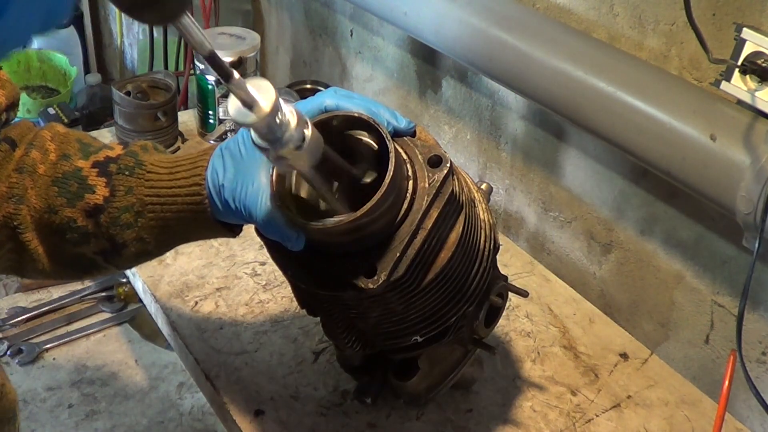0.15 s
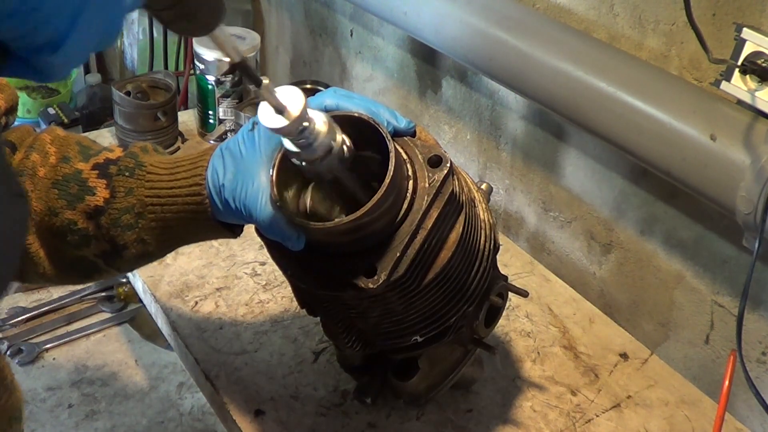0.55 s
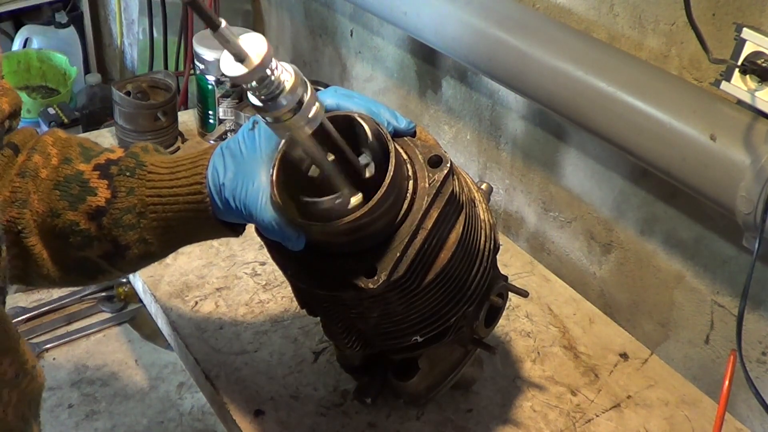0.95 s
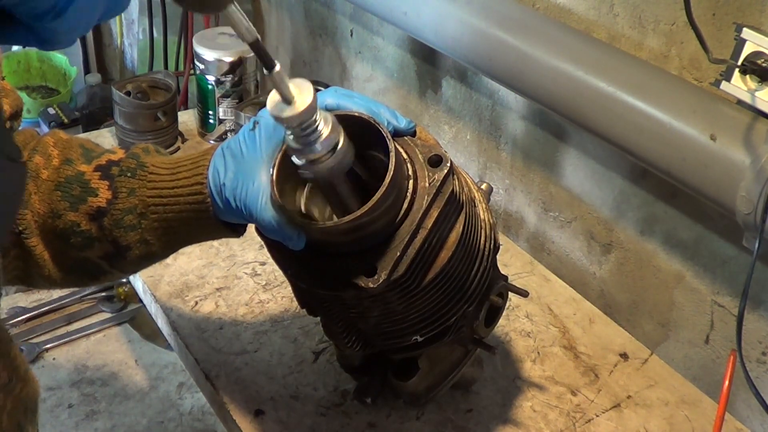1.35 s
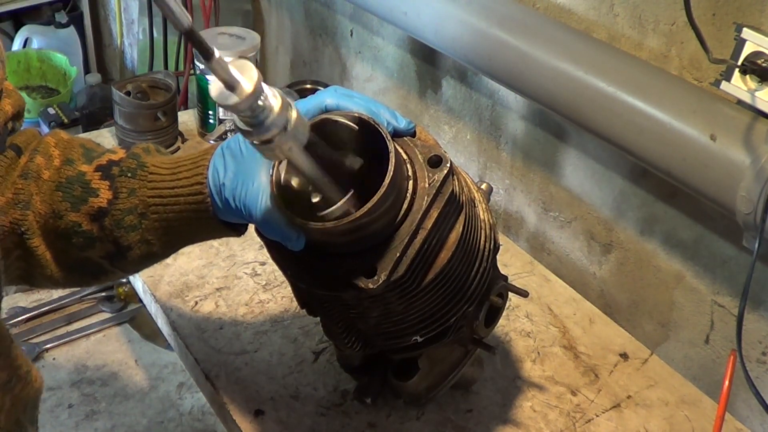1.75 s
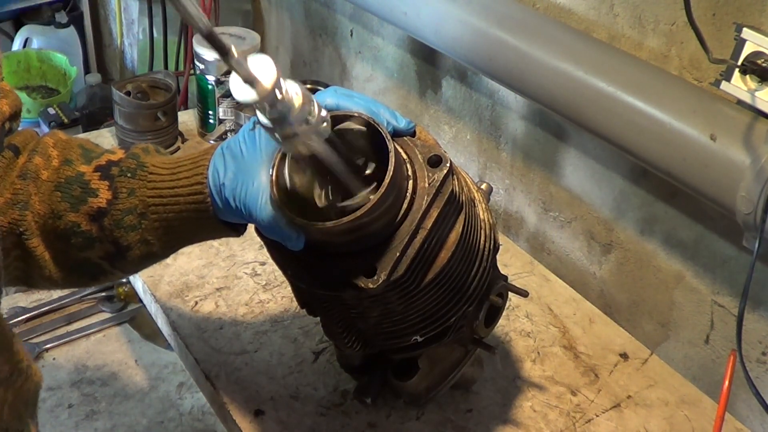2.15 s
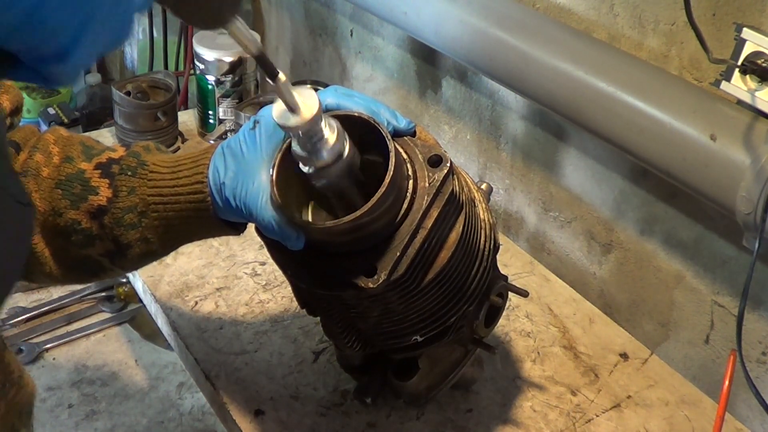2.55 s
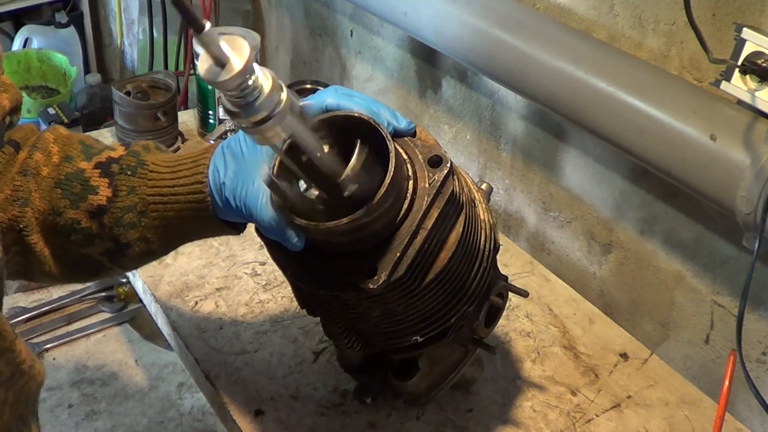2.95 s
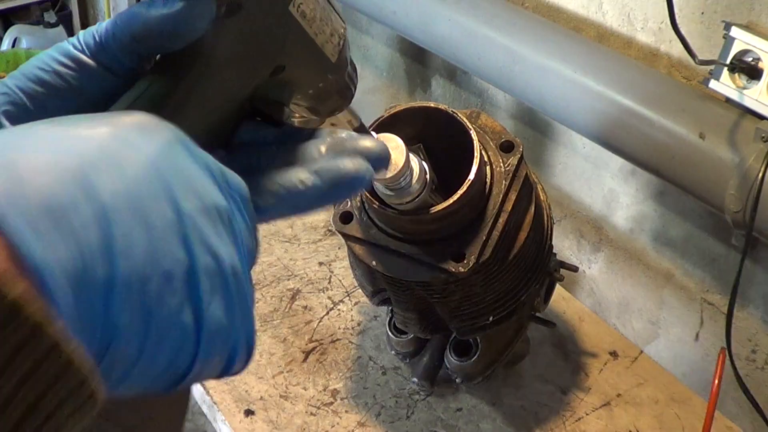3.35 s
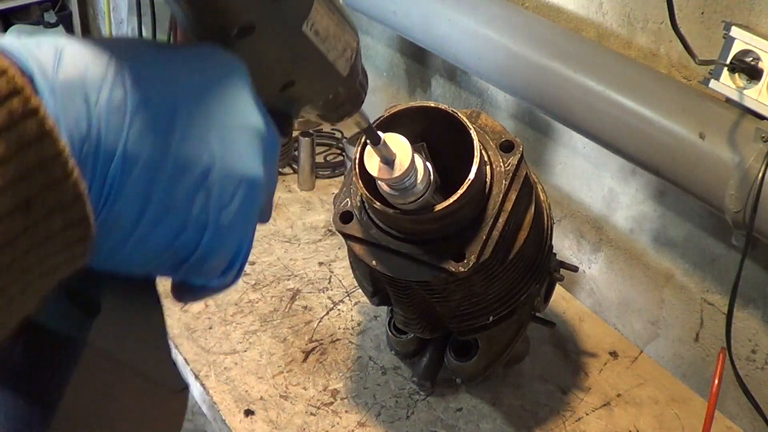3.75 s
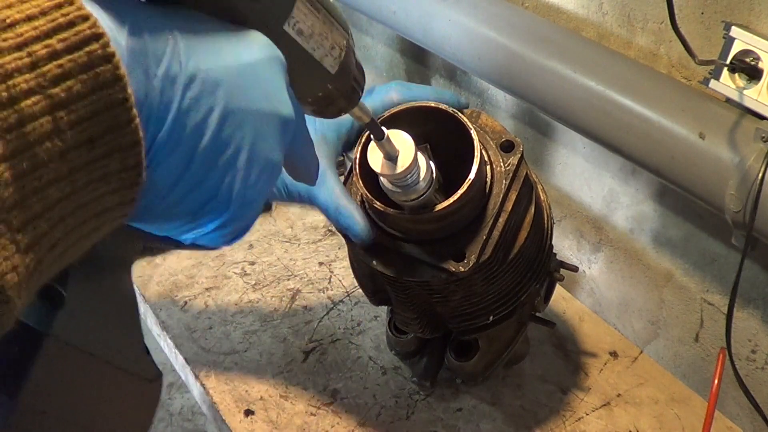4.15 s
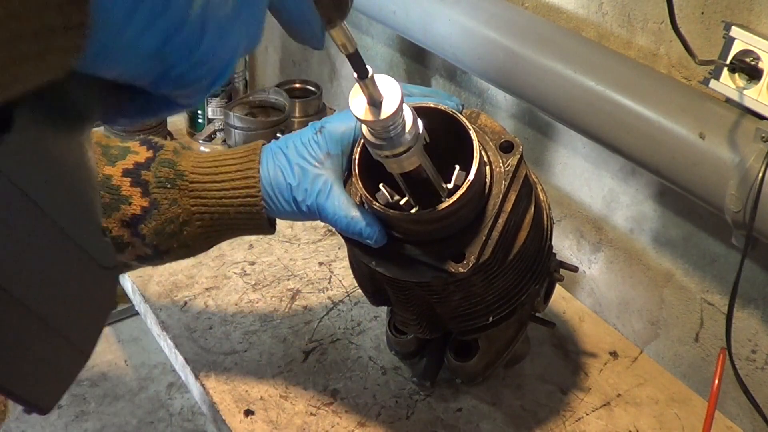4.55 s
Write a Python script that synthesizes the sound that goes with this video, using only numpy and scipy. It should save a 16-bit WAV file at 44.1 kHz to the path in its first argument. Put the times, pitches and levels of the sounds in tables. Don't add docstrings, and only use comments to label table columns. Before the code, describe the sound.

Loud hissing, whining honing with metallic ringing on each stroke stops abruptly; soft handling, a dull bench thud and a bright dragging scrape follow.

```python
import sys
import numpy as np
from scipy import signal
from scipy.fft import rfft, irfft, next_fast_len
from scipy.io import wavfile
from scipy.ndimage import uniform_filter1d, map_coordinates

SR = 44100
rng = np.random.default_rng(int(sys.argv[2]) if len(sys.argv) > 2 else 0)


def ratio_of_db(decibels):
    return 10 ** (np.asarray(decibels, float) / 20)


def store_pcm(level_fs):
    pcm = np.round(np.clip(level_fs, -1, 1) * 32767).astype(np.int16)
    wavfile.write(sys.argv[1], SR, np.atleast_2d(pcm).T)


N = 207711
T = np.arange(N) / SR
CUT = 3.2245


def unit(x):
    return x / np.sqrt(np.mean(x ** 2) + 1e-20)


def along(points, hz):
    f, v = np.transpose(points)
    return np.interp(np.log(hz + 1), np.log(f + 1), v)


def curves(rows):
    s, *cols = np.transpose(rows)
    return [np.interp(T, s, c) for c in cols]


def wobble(rate):
    knots = rng.standard_normal(int(N * rate / SR) + 4)
    return map_coordinates(knots, [T * rate])


def near(s, reach):
    return slice(max(round((s - reach) * SR), 0), round((s + reach) * SR))


def bump(t, s, width):
    return np.exp(-((t - s) / width) ** 2)


def swells(rows, power):
    rows = list(rows)
    out = np.zeros((len(rows), N))
    for hump, (s, rise, fall) in zip(out, rows):
        at = near(s, 7 * max(rise, fall))
        hump[at] = np.exp(-(np.abs(T[at] - s) / np.where(T[at] < s, rise, fall)) ** power)
    return out


def filtered(x, response):
    m = next_fast_len(N + SR // 2)
    return irfft(rfft(x, m) * response(np.fft.rfftfreq(m, 1 / SR)), m)[..., :N]


def mode(f, hz, width):
    return 1j * f * width / (hz * hz - f * f + 1j * f * width)


def grit(patchy_db, grain_db, size=256):
    z = signal.stft(rng.standard_normal((2, N)), nperseg=size)[2]
    field = uniform_filter1d(rng.standard_normal(z.shape[1:]), size=2, axis=0)
    field = uniform_filter1d(field, size=6, axis=1)
    patches = signal.istft(z * ratio_of_db(patchy_db * unit(field)), nperseg=size)[1][:, :N]
    return patches * ratio_of_db(grain_db * wobble(700))


def shaped(x, spectrum, peaks=()):
    def response(f):
        lift = sum(np.abs(ratio_of_db(db) * mode(f, hz, width)) ** 2 for hz, width, db in peaks)
        return ratio_of_db(along(spectrum, f)) * np.sqrt(1 + lift)
    return unit(filtered(x, response))


def ringing(modes, own_db, rate):
    out = np.zeros((2, N))
    for hz, width, db in modes:
        push = ratio_of_db(own_db * wobble(rate)) * rng.standard_normal((2, N))
        out += ratio_of_db(db) * unit(filtered(push, lambda f: mode(f, hz, width) * mode(f, hz, 4 * width)))
    return out


# (time [s], how far out [0-1], half length [s])
STROKES = [
    (.36, 0.58, 0.19),
    (1.03, 0.96, 0.15),
    (1.718, .95, 0.18),
    (2.33, 0.88, .16),
    (2.98, 0.92, .16),
]
# (time [s], width [s], strength [0-1])
JOLTS = [
    (.7, .035, 0.99),
    (1.5, .05, .3),
    (1.97, .04, .35),
    (2.7, .1, 0.05),
    (2.96, 0.036, .4),
    (3.225, 0.018, .5),
]
# (frequency [Hz], level [dB per Hz])
STONES = [(1350, -46.5), (2300, -12.5), (3030, -8.5), (3540, -7), (4300, -11.5), (5050, -4), (6880, -4.5),
          (8430, -4), (10900, -6.5), (13400, -9), (15000, -11.5), (15900, -15)]
# (frequency [Hz], width [Hz], level [dB])
FINS = [(4900, 820, -5), (6340, 250, -9), (10920, 490, -1)]
# (frequency [Hz], width [Hz], level [dB])
SQUEAL = [(7910, 210, -4.5), (8500, 350, -0.5), (8960, 1000, -9)]
# (frequency [Hz], width [Hz], level [dB])
LINER = [(2730, 230, -18), (3530, 90, -1), (4880, 150, 0), (5350, 60, -7), (6180, 90, -4), (6540, 150, 4),
         (7250, 120, 3), (10770, 230, 3)]
# (frequency [Hz], level [dB per Hz])
RASP = [(700, -41.5), (1400, -8.5), (1800, -0.5), (2160, -2.5), (2800, -3), (4000, -23.5)]


def hone():
    out = np.array([far for _, far, _ in STROKES]) @ swells([(s, half, half) for s, _, half in STROKES], power=4.1)
    jolt = np.array([hard for *_, hard in JOLTS]) @ swells([(s, wide, wide) for s, wide, _ in JOLTS], power=2)
    scrape_db = -17.32 - 1.8 * out + 0.96 * wobble(14)
    scrape = ratio_of_db(scrape_db) * shaped(grit(patchy_db=2.6, grain_db=1.5, size=512), STONES, FINS)
    squeal_db = -22.5 + 0.33 * out - 0.69 * T - 9 * jolt
    wakes = 1 - np.exp(-T / 0.033)
    squeal = wakes * ratio_of_db(squeal_db) * ringing(SQUEAL, own_db=1.5, rate=25)
    ring = ratio_of_db(-44 + 12.04 * out) * ringing(LINER, own_db=2.2, rate=45)
    rasp_db = -29 - 4 * out + 5.1 * jolt
    rasp = ratio_of_db(rasp_db) * shaped(grit(patchy_db=2.5, grain_db=1.0, size=512), RASP, [(2060, 190, 0)])
    return scrape + squeal + ring + rasp


# (time
# [s], level [dB rms], frequency [Hz], width [s])
FLARES = [(1.005, -28, 3560, .016), (1.11, -34, 3520, .02), (2.44, -32, 4900, .03), (1.71, -32, 4860, .04),
          (2.39, -32, 4850, .03), (1.63, -31, 7260, .03), (2.32, -30, 7270, .04), (.3, -35, 3540, .07),
          (1.68, -30, 3560, .03), (1.85, -34, 3520, .03), (1.93, -36, 3490, .025), (2.26, -32, 3530, .035),
          (2.4, -35, 3470, .015), (2.85, -35, 3530, .03), (.255, -26, 4850, 0.028), (.93, -29, 4870, 0.02),
          (1.05, -25, 6500, .035), (1.045, -28, 3570, .03), (.3, -30, 7280, .05), (.93, -29, 7270, .03),
          (1.12, -29, 7270, .05), (1.72, -30, 7270, .07), (2.9, -29, 7260, .04), (3.04, -28, 7250, .04),
          (1.04, -34, 4830, .06), (2.32, -30, 4850, .05), (2.92, -32, 4860, .03), (4.115, -42, 4900, .02),
          (4.105, -43, 5560, .018), (1.65, -31, 4850, 0.031), (2.27, -24, 6540, .03),
          (1.61, -33, 3560, 0.02), (1.76, -29, 3520, .035), (2.34, -29, 3540, .03), (2.9, -31, 3550, .025),
          (3.06, -31, 3530, .025), (3.12, -29, 4860, .05), (2.22, -29, 7300, .03), (2.44, -29, 7260, .045),
          (4.395, -31, 6080, .012), (4.43, -28, 6050, .012), (4.515, -31, 6050, .01),
          (4.57, -31, 4830, .008), (4.525, -33, 4850, .008), (4.39, -42, 2740, .02),
          (4.445, -44.5, 449, 0.018), (4.448, -37, 2260, .009), (4.482, -33, 2270, 0.017),
          (4.41, -39, 3540, .025), (4.472, -39, 3520, .015), (4.41, -45, 2250, .02),
          (4.565, -38, 2270, .015), (4.485, -43, 2770, .02), (4.495, -35, 3550, 0.013),
          (4.532, -38, 3550, .008), (4.55, -33.5, 2740, 0.025), (4.583, -29, 3560, 0.007),
          (4.6, -29, 3560, .007), (4.58, -32, 2730, 0.016), (4.62, -46, 2740, 0.018),
          (4.635, -39, 3570, 0.006)]


def flares():
    rough = ratio_of_db(1.6 * wobble(70))
    drift = .95 * wobble(70)
    line = np.zeros(N)
    for s, db, hz, width in FLARES:
        at = near(s, .2)
        line[at] += ratio_of_db(db + 3) * bump(T[at], s, width) * np.sin(2 * np.pi * hz * T[at] + drift[at])
    return np.array([rough * line, .5 * np.roll(line, 60)])


# (time [s], order, change [dB], width [s])
FADES = [(.5, 2, -8, .08), (1.0, 2, -10, .03), (1.32, 2, -8, .04), (1.46, 2, 6, .03), (1.68, 2, -6, .06),
         (2.63, 3, 2, .02), (1.88, 3, 3, .03), (3.15, 3, 2, .04), (2.41, 2, -10, .04), (2.68, 2, -6, .03),
         (2.87, 2, -8, .03), (3.08, 2, -7, .1), (3.0, 1, -6, .05), (2.42, 1, -5, .04), (.42, 1, -4, .03),
         (.17, 1, -5, .04), (1.3, 3, -6, .04), (.6, 3, 2, .08), (.31, 3, 3, .04), (.72, 3, -4, .04),
         (.86, 3, 3, .05), (2.15, 3, 3, .05), (2.78, 3, 3, .06), (3.03, 3, -3, .04), (2.63, 3, 3, .03)]


def fades(order):
    out = np.zeros(N)
    for s, k, db, width in FADES:
        if k == order:
            at = near(s, .25)
            out[at] += db * bump(T[at], s, width)
    return out


# (time [s], shaft frequency [Hz], order 1 [dB], order 3 [dB])
MOTOR = [(0.0, 400.5, -37, -48), (0.045, 552, -36, -43), (0.11, 614, -40, -39), (0.21, 585, -37.5, -43),
         (0.3, 533, -37, -33), (0.425, 482, -37, -40), (0.53, 501, -34.5, -37), (0.7, 506, -31.5, -39),
         (0.98, 517, -37, -32), (1.42, 507.4, -33, -42), (1.47, 520.3, -33.5, -27.5),
         (1.7, 547.8, -32, -40), (1.95, 538, -32.5, -29), (2.38, 526.5, -35.5, -36),
         (2.52, 526, -28.5, -31), (2.69, 514, -27, -35), (2.96, 528, -33, -35), (3.22, 522.5, -28.5, -35)]
# (time [s], change [Hz], rise [s], fall [s])
SAGS = [
    (.64, 5, .06, .02),
    (1.3, -9, .07, .07),
    (2.19, -4, .05, .05),
    (2.46, -4, .05, .04),
    (2.64, 10, .09, .006),
    (2.68, -4, .02, .04),
    (2.85, 4, .07, .07),
    (1.72, 3, .01, .05),
]
# (multiple of the whine, level [dB])
GEARS = [(1.11, -51), (1.333, -53)]
# (time [s], order, level [dB rms], width [s])
BREAKS = [(.07, 5, -32, .02), (.55, 5, -41, .08), (.71, 5, -38, .03), (1.1, 5, -41, .06),
          (2.3, 5, -34, .045), (2.47, 5, -33, .018), (2.72, 5, -36, .07), (.71, 4, -32, .025),
          (1.58, 4, -35, .025), (1.73, 4, -34, .04), (1.85, 4, -35, .025), (2.32, 4, -34, .035),
          (2.39, 4, -35, .025), (2.75, 4, -39, .03), (3.0, 4, -40, .08), (1.05, 7, -35, .04),
          (2.93, 7, -36, .04), (2.16, 6, -36, .015)]
# (frequency [Hz], level [dB per Hz])
CASING = [(25, -21), (200, -44), (480, -6.5), (800, -0.5), (1100, 6.5), (1500, -5), (2200, 4), (4000, -48)]


def motor():
    hz, first, third = curves(MOTOR)
    first = first - 8.5 * np.clip((T - 1.5) / 0.019, 0, 1)
    pulls = swells([(s, rise, fall) for s, _, rise, fall in SAGS], power=2)
    hz = hz + np.array([row[1] for row in SAGS]) @ pulls
    drift = .17 * wobble(30)
    turn = 2 * np.pi * np.cumsum(hz) / SR + drift
    young = -10 * np.clip(2 - 2 * T / .45, 0, 1)
    second = -43 + 1.5 * wobble(25) + young + fades(order=2)
    fourth = -54 - .4 * (first - first.mean()) + 4.5 * wobble(14) + young
    first = first + fades(order=1) + .9 * wobble(12)
    third = third + fades(order=3)
    line = np.zeros(N)
    for k, db in [(1, first), (2, second), (3, third), (4, fourth), *GEARS]:
        line += np.sqrt(2) * ratio_of_db(db + 0.52 * k * wobble(45)) * np.sin(k * turn)
    flutter_db = 3 * unit(drift)
    for s, k, db, width in BREAKS:
        at = near(s, .25)
        line[at] += ratio_of_db(db + 3 + flutter_db[at]) * bump(T[at], s, width) * np.sin(k * turn[at])
    roar = ratio_of_db(-37.5) * shaped(grit(patchy_db=1.5, grain_db=1.5), CASING)
    return np.array([line, 0 * line]) + roar


# (frequency [Hz], level [dB per Hz])
DRAGGED = [(2000, -30), (3000, -16), (4000, -15), (5000, -8), (6500, -3), (8450, -1.5), (11000, -9),
           (14900, -15), (16000, -18)]
# (frequency [Hz], width [Hz], level [dB])
BORE = [(4800, 26, 2), (5100, 170, -1), (5570, 49, -16), (6160, 88, -3.5), (6900, 78, -7), (7380, 21, 2),
        (7940, 120, -4), (8400, 140, -1), (10800, 54, -11)]
# (frequency [Hz], width [Hz], level [dB])
MOUTH = [(2270, 70, -7), (2740, 100, -6), (3550, 60, 1)]
# (frequency [Hz], level [dB per Hz])
RUMBLE = [(250, -15), (500, -4.5), (1000, 0), (1600, 3), (2500, -4), (3500, -10), (5000, -30)]


def drag():
    full_s, free_s = 4.415, 4.588
    late = np.clip(full_s - T, 0, 1) / .045
    gone = np.clip(T - free_s, 0, 1) / .034
    speed = np.exp(-late ** 1.7 - gone ** 2.3)
    since = np.clip(T - full_s, -.1, .2)
    scrape_db = -20 - 12 * since + 0.77 * wobble(60)
    bore = [(hz, width, db + 8) for hz, width, db in BORE]
    scrape = ratio_of_db(scrape_db) * shaped(grit(patchy_db=2.0, grain_db=1.5), DRAGGED, bore)
    ring = ratio_of_db(-43 + 18 * since) * ringing(MOUTH, own_db=2.5, rate=45)
    rumble = ratio_of_db(-40.5) * shaped(grit(patchy_db=2.5, grain_db=1.5), RUMBLE)
    return speed * scrape + speed ** 0.75 * (ring + rumble)


# (time [s], peak level [dB], frequency [Hz], t60 [s])
PADS = [
    (3.297, -30, 500, .009),
    (3.297, -33, 850, .006),
    (3.326, -26, 310, .014),
    (3.326, -31, 850, .006),
    (3.339, -29, 310, .014),
    (3.339, -33, 800, .006),
    (3.369, -35, 430, .012),
    (3.577, -25, 300, .03),
    (4.337, -27, 300, .03),
]
# (time [s], peak level [dB], frequency [Hz], t60 [s])
TICKS = [(3.698, -35, 1500, .005), (3.543, -31, 1750, 0.006), (3.543, -34, 2450, .006),
         (3.567, -31, 1750, .012), (3.568, -33, 2300, .012), (3.567, -33, 850, .015),
         (3.569, -34, 520, .02), (3.6066, -29, 2030, 0.007), (3.623, -29, 1660, 0.006),
         (3.666, -27, 1680, 0.007), (3.8667, -29, 2400, 0.005), (3.8667, -33, 1600, .004),
         (4.132, -33, 1600, 0.022), (4.331, -34, 1500, .012), (4.333, -35, 2300, .012)]
# (time [s], peak level [dB], frequency [Hz], t60 [s])
SNAPS = [
    (3.7838, -27, 9660, .004),
    (3.7942, -30, 7500, .006),
    (4.2324, -30, 9430, .002),
    (4.2875, -20, 8500, .004),
    (4.087, -26, 8300, .004),
]
# (time [s], peak level [dB], frequency [Hz], t60 [s])
CLINKS = [
    (3.567, -35, 3620, 0.06),
    (3.7355, -28, 7980, 0.03),
    (4.087, -26, 8260, .025),
    (3.7937, -27, 10200, .015),
    (4.138, -43.5, 3550, 0.14),
    (4.288, -27, 6070, 0.045),
    (4.288, -30, 5160, 0.03),
    (4.146, -42, 400, .06),
    (4.252, -46, 1220, .04),
    (4.437, -40, 830, .04),
]
# (time [s], peak level [dB], t60 [s])
THUDS = [
    (3.565, -39, .1),
    (3.577, -32, .36),
    (3.698, -48, .15),
    (4.328, -43, .1),
    (4.337, -33.5, .16),
    (4.141, -49, .08),
]
# (frequency [Hz], level [dB], share of the t60)
BENCH = [(270, -4, 1.56), (252, -6, 0.25), (205, -8, 0.083), (327, 1.5, 0.3), (433, -5, .16),
         (760, -9, 0.06), (590, -5, .08)]


def knocks():
    out = np.zeros(N + SR)
    t = np.arange(SR // 2) / SR
    thuds = [(s, db + gain, hz, t60 * share) for s, db, t60 in THUDS for hz, gain, share in BENCH]
    for s, db, hz, t60 in [*PADS, *TICKS, *SNAPS, *CLINKS, *thuds]:
        soft = 1 - np.exp(-t * hz / .4)
        out[round(s * SR):][:len(t)] += ratio_of_db(db + 3 - 60 * t / t60) * soft * np.sin(2 * np.pi * hz * t)
    puff = sum(ratio_of_db(db - 6 - 60 * np.clip(T - s, 0, 1) / .07) * (T > s) for s, db, _ in THUDS)
    dull = filtered(rng.standard_normal(N), lambda f: mode(f, 320, 0.88 * 320) ** 2)
    out = out[:N] + puff * unit(dull)
    out = filtered(out, lambda f: (1j * f / (160 + 1j * f)) ** 2)
    return np.array([out, 0.2 * np.roll(out, 40)])


# (time [s], glove level [dB], sleeve re glove [dB], rise [s], fall [s])
HANDS = [
    (3.45, -40, -17, 0.088, 0.059),
    (3.59, -38.5, -7.5, 0.071, 0.14),
    (3.77, -47.5, -16, 0.055, 0.084),
    (4.02, -42, -10, 0.07, 0.12),
    (4.11, -40.5, -22, 0.022, 0.038),
    (4.2, -46, -13, 0.03, 0.05),
    (4.265, -48, -10, .025, .02),
    (4.32, -40, -21, 0.027, 0.064),
    (4.66, -47.5, -6.5, .2, 0.046),
]
# (frequency [Hz], level [dB per Hz])
GLOVE = [(1470, -21.5), (2500, -8.5), (3210, -9), (4760, -4.5), (6010, -5.5), (9220, -3.5), (12000, -9.5),
         (14000, -13), (15800, -12.5)]
# (frequency [Hz], level [dB per Hz])
SLEEVE = [(300, -8), (700, -4.5), (1100, -3.5), (1650, 1.5), (2300, -1.5), (3500, -26)]
# (time [s], level [dB rms], centre frequency [Hz], rise [s], fall [s])
RUBS = [(3.349, -39, 9000, 0.0023, 0.012), (3.404, -37, 6040, .005, 0.006), (3.648, -38, 2400, .022, .014),
        (3.54, -43, 1900, .03, .02), (3.475, -42, 3300, .03, .02), (3.44, -44, 6000, .012, 0.017),
        (3.655, -34, 5000, .012, .01), (3.59, -40, 5500, .015, .012), (3.463, -35, 6000, 0.0036, 0.015),
        (3.545, -33, 6500, 0.012, 0.016), (3.565, -24, 6300, 0.001, 0.009), (3.65, -21, 8800, 0.018, 0.016),
        (3.737, -35, 5800, .001, 0.005), (4.088, -31, 8000, .0006, 0.005), (4.096, -38, 8000, .001, 0.003),
        (3.374, -42, 9300, .001, .005), (3.76, -42, 7000, .003, .01), (3.634, -33, 9400, .005, .005),
        (4.369, -28, 8500, .002, .008), (4.395, -23, 7000, .005, .006), (4.535, -23, 8000, .006, .008),
        (4.575, -23, 7500, .006, .008), (4.117, -36, 8000, .006, .005), (4.134, -20.5, 7100, 0.007, 0.0082),
        (4.2875, -25.5, 7400, .0005, 0.0074), (4.432, -20, 7500, .008, .008),
        (4.48, -20.5, 8000, .012, .008), (4.506, -18.5, 8300, .01, .012), (3.975, -47, 1900, .025, .06),
        (4.647, -41, 8500, .003, .005), (4.669, -40, 9200, .003, .006), (4.331, -24, 6700, 0.005, 0.0052),
        (4.333, -40, 3300, .005, .007)]


def hands():
    s, glove_db, sleeve_db, rise, fall = np.transpose(HANDS)
    moves = swells(zip(s, rise, fall), power=1.27)
    glove = ratio_of_db(-52) + ratio_of_db(glove_db) @ moves
    sleeve = ratio_of_db(-59.5) + ratio_of_db(glove_db + sleeve_db) @ moves
    out = glove * ratio_of_db(1.5 * wobble(40)) * shaped(grit(patchy_db=1.3, grain_db=2.5), GLOVE)
    out = out + sleeve * ratio_of_db(1.5 * wobble(30)) * shaped(grit(patchy_db=1.3, grain_db=2.5), SLEEVE)
    skin = grit(patchy_db=2.5, grain_db=2.2)
    for s, db, hz, rise, fall in RUBS:
        at = near(s, .1)
        t = T[at] - s
        f = np.fft.rfftfreq(len(t), 1 / SR)
        swell = np.exp(-(np.abs(t) / np.where(t < 0, rise, fall)) ** 1.3)
        pitch = mode(f, hz, 0.81 * hz) ** 2 + 0.087
        out[:, at] += ratio_of_db(db) * swell * unit(irfft(rfft(skin[:, at]) * pitch, len(t)))
    return out * [[1], [1.7]]


# (frequency [Hz], level [dB per Hz])
AIR = [(25, -44), (60, -24), (125, -27), (250, -3.5), (430, 3.5), (860, 1.5), (1500, -4.5), (2300, -23),
       (4000, -18), (8800, -16), (16000, -16)]


def air():
    return ratio_of_db(-54) * shaped(rng.standard_normal((2, N)), AIR)


# (time [s], change [dB], width [s])
SKIPS = [
    (.6705, -16, .0018),
    (.686, -6, .009),
    (2.6615, -16, .0013),
]
# (frequency [Hz], left-right coherence [0-1])
ALIKE = [(60, 0.98), (200, 0.96), (500, 0.98), (1000, 0.83), (2000, 0.92), (3300, 0.75), (4500, 0.94),
         (6500, 0.91), (8800, 0.94), (10000, 0.99), (12000, 0.6), (15500, 0.34)]
# (frequency [Hz], left leads by [rad])
LEAD = [(30, 0), (520, -.75), (1100, -.4), (2000, -.15), (3100, -.4), (4200, 0), (16000, 0)]
# (frequency [Hz], left minus right [dB])
TILT = [(60, -1), (150, -1.5), (380, 1), (950, 1.5), (2380, 1.5), (5980, 0), (15000, 1)]


def scene():
    running = np.clip((CUT - T) / 0.0008, 0, 1)
    contact = ratio_of_db(sum(db * bump(T, s, width) for s, db, width in SKIPS))
    drilling = running * contact * (hone() + motor())
    handling = (1 - running) * (drag() + knocks() + hands())
    both = drilling + handling + flares() + air()

    def split(f):
        angle = np.arccos(np.clip(along(ALIKE, f), 0, 1)) / 2
        return np.array([np.cos(angle), np.sin(angle)])

    def ports(f):
        left = ratio_of_db(along(TILT, f) / 2) * np.exp(.5j * along(LEAD, f))
        return np.array([left, 1 / left])

    direct, scattered = filtered(both, split)
    return filtered(np.array([direct + scattered, direct - scattered]), ports)


# (frequency [Hz], kept while drilling [0-1], kept afterwards [0-1])
WIDE = [(3600, 1, 1), (4000, .25, .8), (6000, .3, .8), (6500, 1, 1), (9000, 1, 1), (9500, .3, .08),
        (16000, .36, .05)]


def narrowed(x):
    hz, t, z = signal.stft((x[0] - x[1]) / 2, SR, nperseg=1024)
    blocks = rng.random((len(hz) // 16 + 1, len(t) // 4 + 1))
    dice = np.kron(blocks, np.ones((16, 4)))[:len(hz), :len(t)]
    f, drilling, after = np.transpose(WIDE)
    share = np.where(t < CUT, np.interp(hz, f, drilling)[:, None], np.interp(hz, f, after)[:, None])
    side = signal.istft(z * (dice < share), SR, nperseg=1024)[1][:N]
    return x.mean(0) + np.array([side, -side])


def top_cut(x):
    return signal.sosfilt(signal.butter(12, 16050, fs=SR, output="sos"), x)


def record(dry):
    faded_in = dry * np.clip(T / 0.0013, 0, 1)
    x = filtered(faded_in, lambda f: (f < 15850) * (1j * f / (70 + 1j * f)) ** 2)
    x = x / (1 + np.abs(x / .66) ** 4) ** (1 / 4)
    return top_cut(narrowed(x))


dry = scene()
out = record(dry)
store_pcm(out)
```